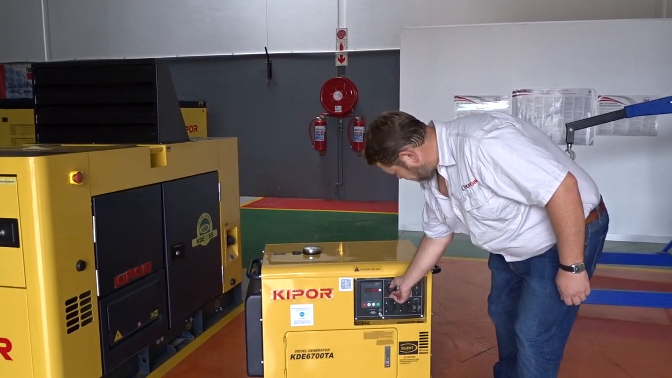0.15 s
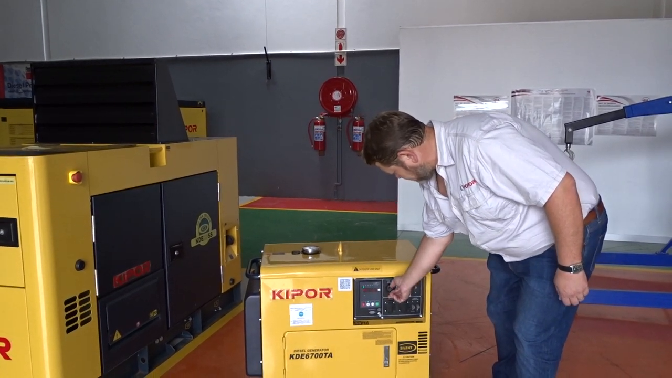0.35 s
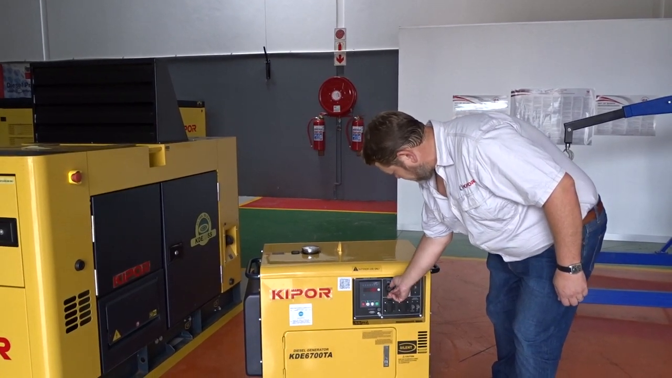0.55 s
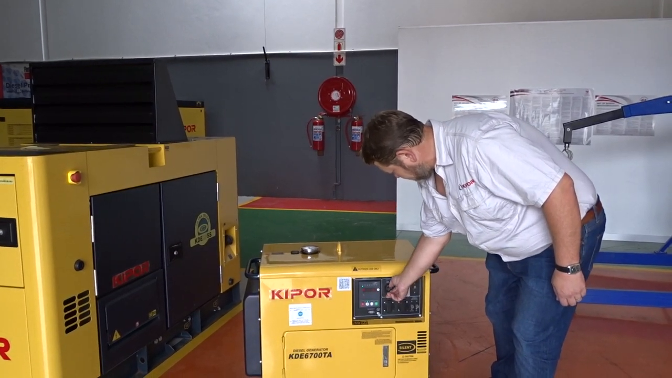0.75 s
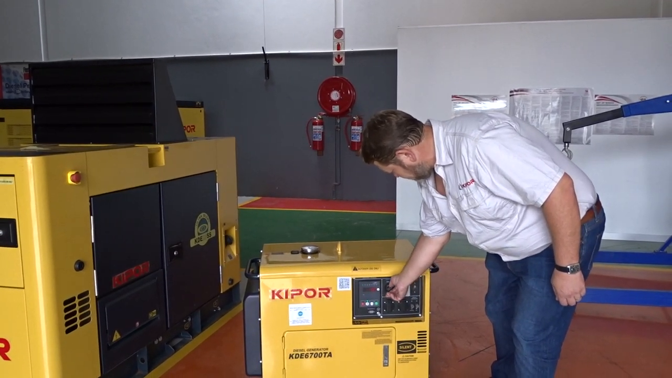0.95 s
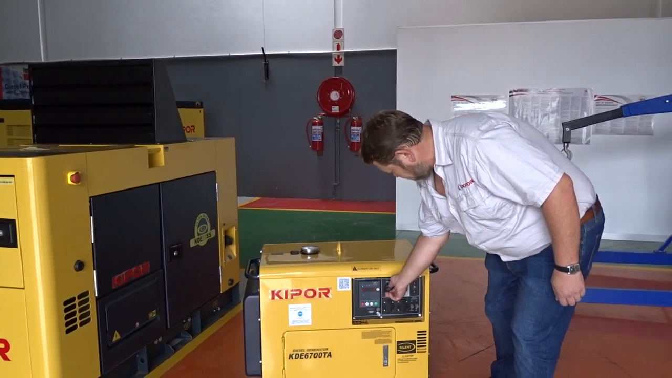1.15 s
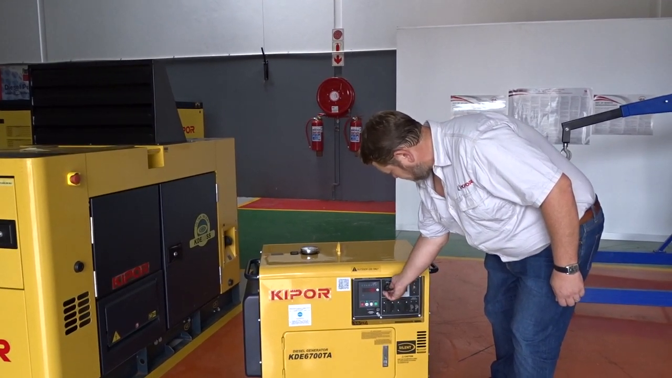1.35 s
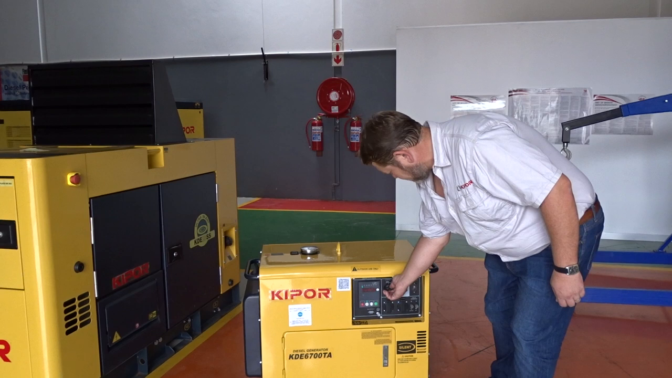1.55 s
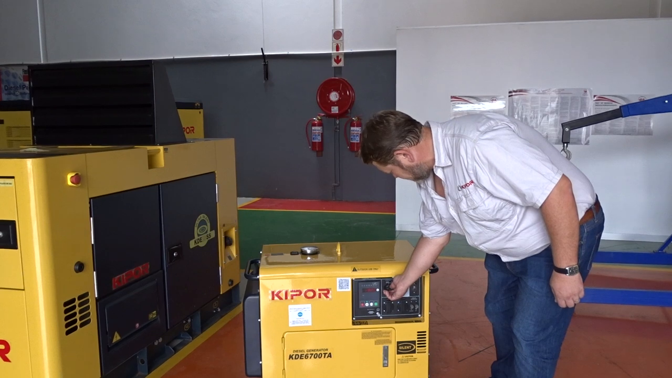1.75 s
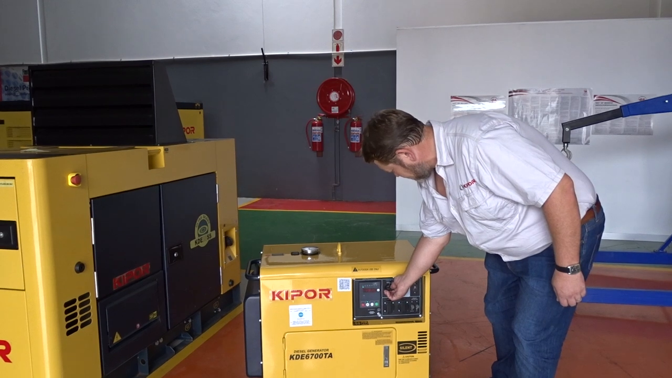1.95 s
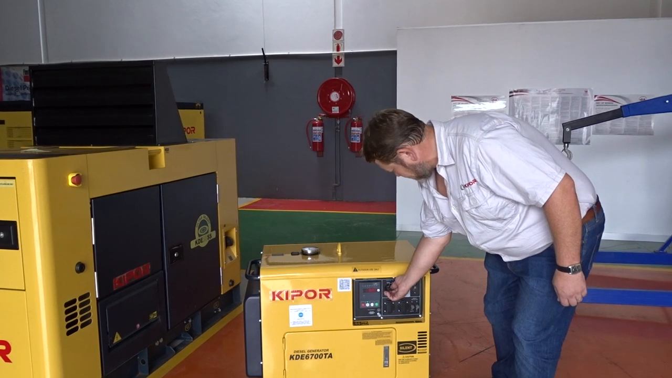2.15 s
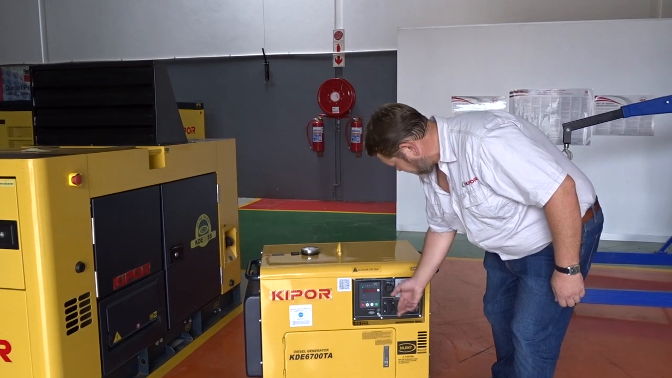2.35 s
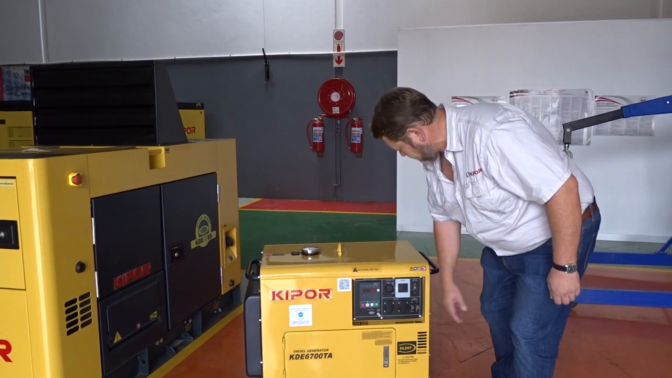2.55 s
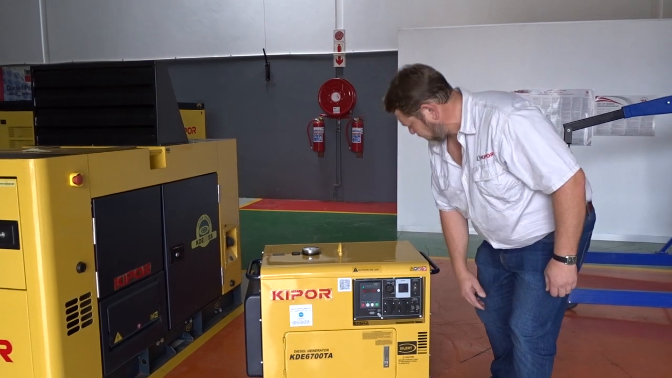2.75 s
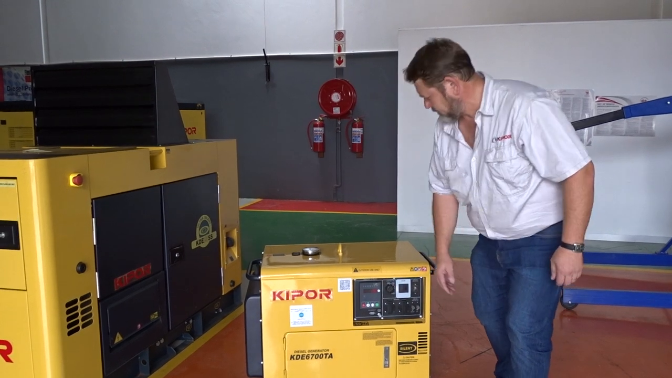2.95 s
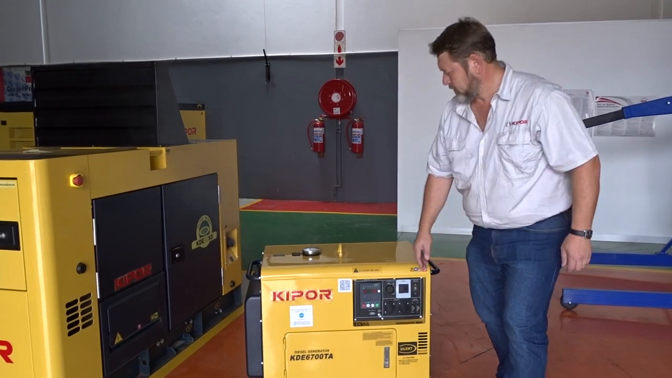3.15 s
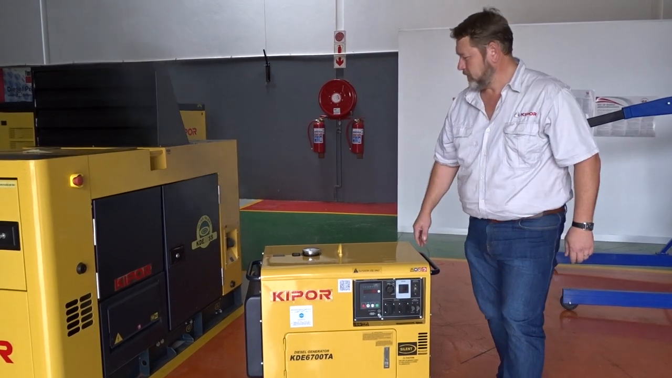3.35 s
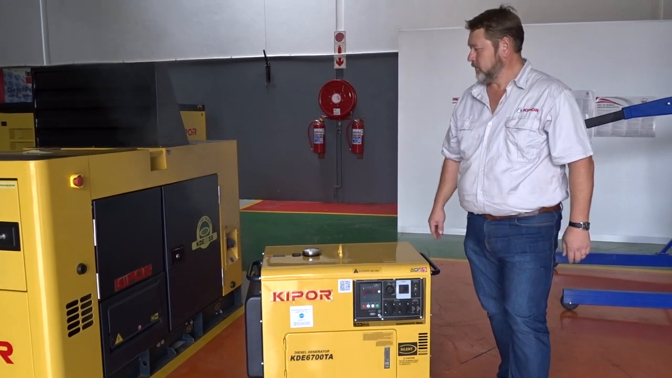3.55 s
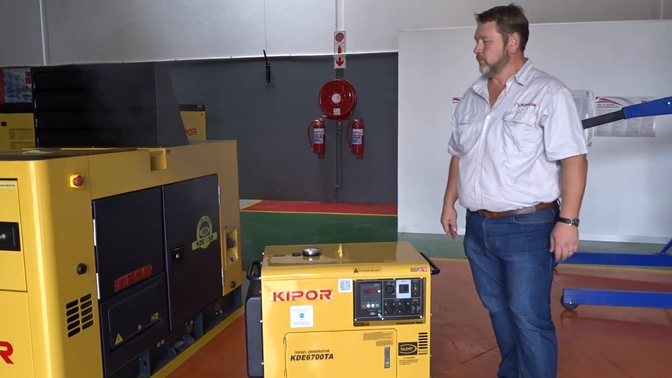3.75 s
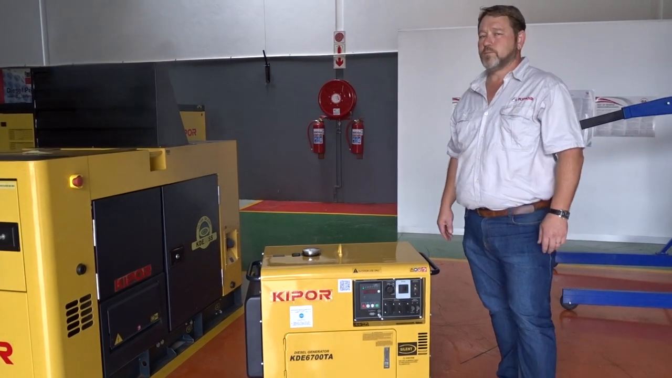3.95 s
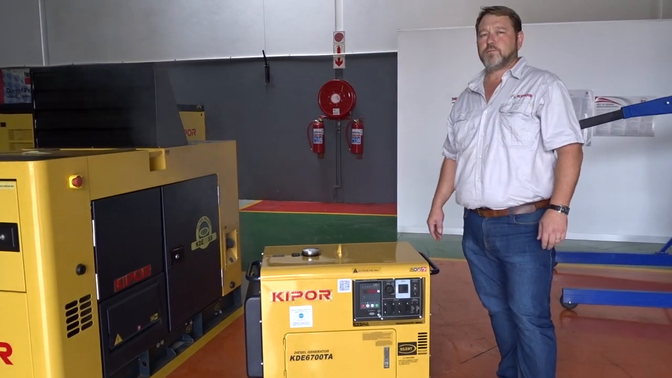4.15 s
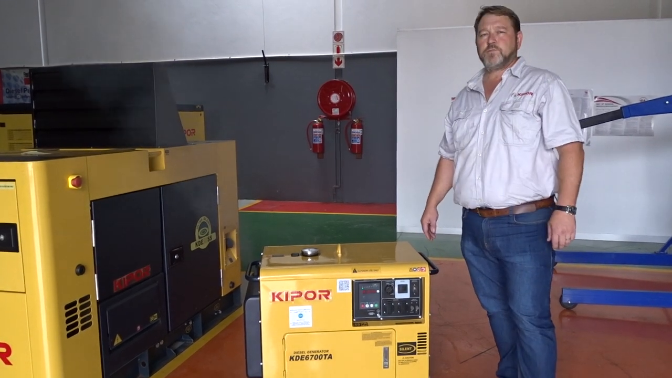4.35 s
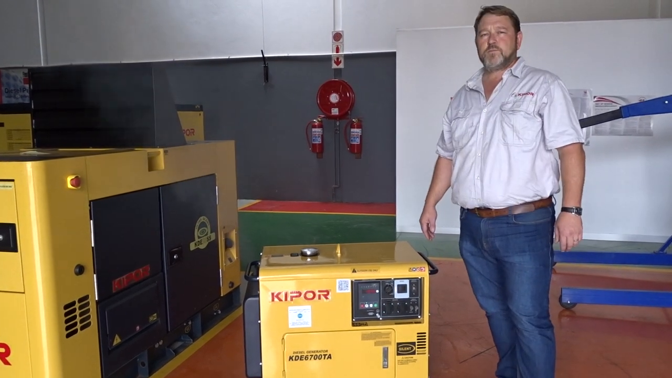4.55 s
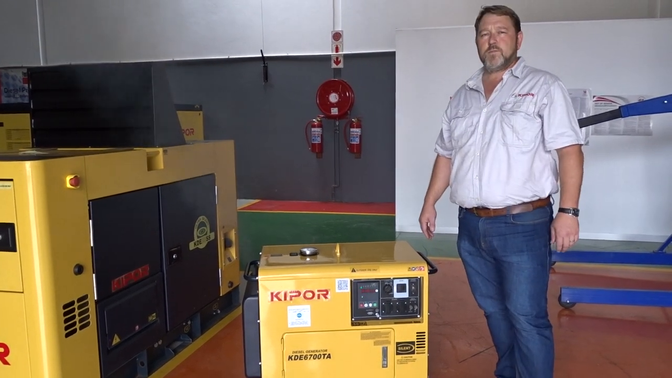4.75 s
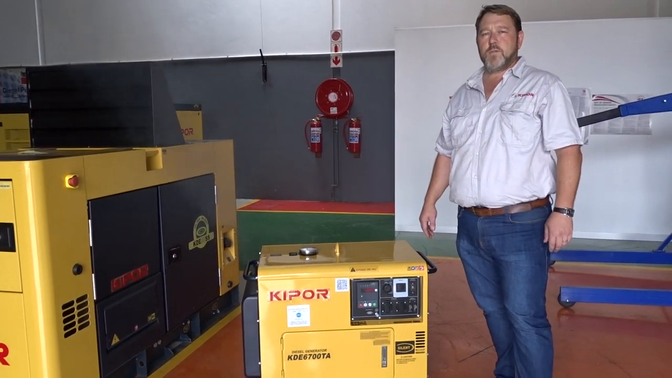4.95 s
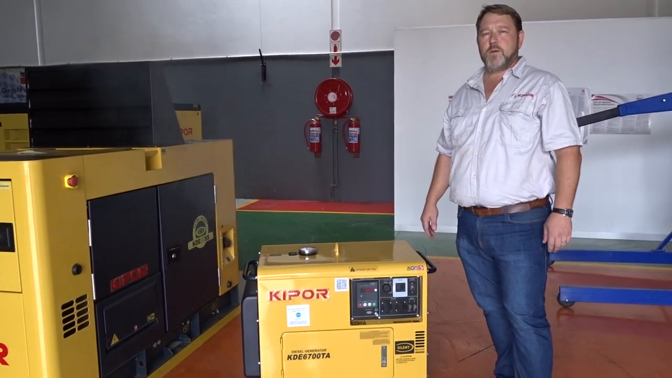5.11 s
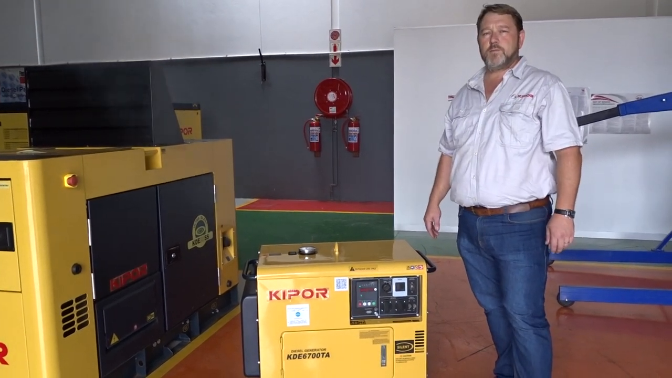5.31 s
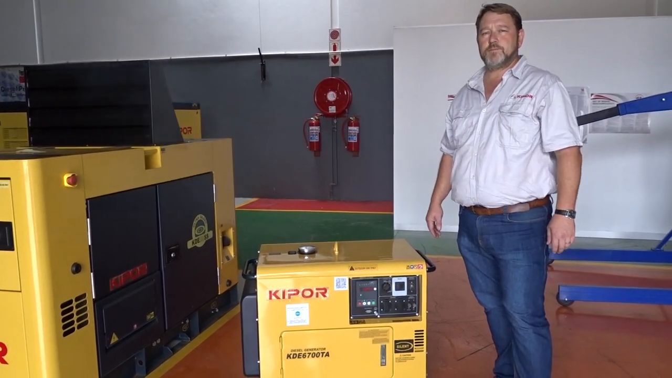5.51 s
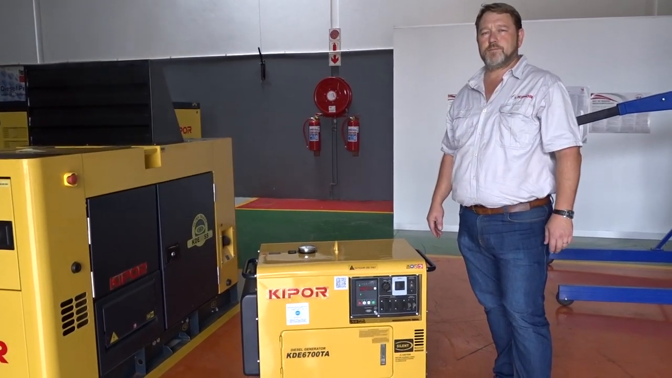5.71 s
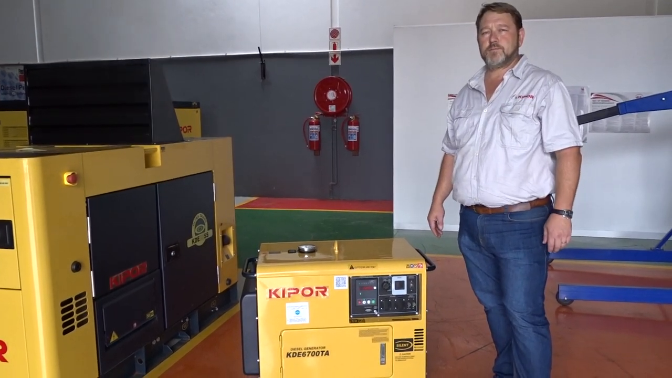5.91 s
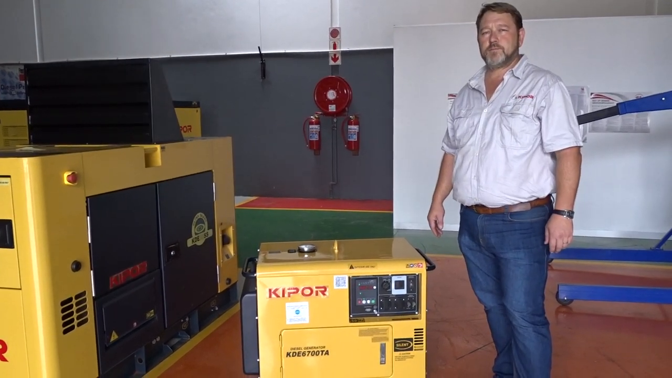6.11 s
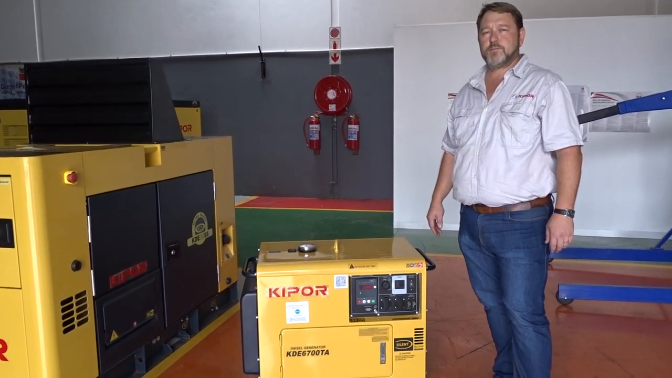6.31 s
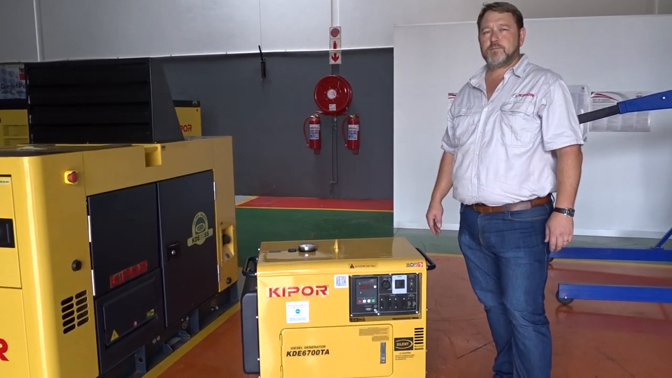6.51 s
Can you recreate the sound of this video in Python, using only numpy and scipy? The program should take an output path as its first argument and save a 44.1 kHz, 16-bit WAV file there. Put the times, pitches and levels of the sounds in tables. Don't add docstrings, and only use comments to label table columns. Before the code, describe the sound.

A boxed diesel generator starts indoors, heard in stereo from a few metres. Quiet room noise, a dry key click and relay snap, then a harsh metallic starter grind climbing in pitch. The first firing thumps the box; separate knocks quicken over rattling panels and blend into a low buzzing exhaust note with bright valve clatter, holding constant speed to the end.

```python
import sys
import numpy as np
from scipy import signal
from scipy.io import wavfile
from scipy.ndimage import uniform_filter1d

SR = 44100
rng = np.random.default_rng(int(sys.argv[2]) if len(sys.argv) > 2 else 0)


def dump(signal):
    limited = np.clip(np.atleast_2d(signal).T, -1, 1)
    pcm = np.round(limited * 32767).astype(np.int16)
    wavfile.write(sys.argv[1], SR, pcm)


def rack_gain(trim_db):
    fader = np.asarray(trim_db, float)
    return 10 ** (fader / 20)


N = 294147
T = np.arange(N) / SR

FIRST_FIRING_S = 2.055
GOVERNED_PER_S = 26.2

# (time [s], mesh frequency [Hz])
SPIN = [(1.36, 1350), (1.44, 1450), (1.55, 1680), (1.66, 2000), (1.78, 2330), (1.9, 2440), (2.03, 2630),
        (2.12, 2700), (2.3, 2750)]
# (frequency [Hz], likeness [0-1])
NEAR_LIKENESS = [(25, 0.97), (60, 1), (140, 1), (340, 0.93), (600, 0.94), (900, 0.82), (1920, 0.74),
                 (4570, 0.92), (10900, 0.63)]


def evened(x):
    return x / np.sqrt(np.mean(x ** 2) + 1e-20)


def steadied(x, span_s):
    power = uniform_filter1d((x ** 2).mean(0), round(span_s * SR))
    return x / np.sqrt(abs(power) + 1e-12)


def read(points, hz):
    f, value = np.transpose(points)
    return np.interp(np.log(hz + 1), np.log(f + 1), value)


def columns(rows):
    s, *values = np.transpose(rows)
    return [np.interp(T, s, v) for v in values]


def swells(rows, width_s):
    return sum(db * np.exp(-((T - s) / width_s) ** 2) for s, db in rows)


def wander(per_s):
    return evened(sum(np.sin(2 * np.pi * (f * T + rng.random())) / np.sqrt(f)
                      for f in np.geomspace(per_s / 10, per_s, num=16)))


def rings(modes):
    return lambda hz: np.sqrt(sum(rack_gain(2 * db) / (1 + (2 * (hz - f) / w) ** 2) ** 2 for f, w, db in modes))


def noise(colour, likeness=NEAR_LIKENESS, patchy_db=1.0, size=2048):
    # (frequency [Hz], left minus right [dB])
    left_lead = [(60, 0.0), (170, -0.5), (480, 1), (1360, -1.0), (3840, -1.0), (10900, -1.5)]
    frames, hz = 4 * N // size + 5, np.fft.rfftfreq(size, 1 / SR)
    a, b, c, d, patches = rng.standard_normal((frames, len(hz), 5)).T
    patches = uniform_filter1d(patches, size=12, axis=0)
    patches = evened(uniform_filter1d(patches, size=6, axis=1))
    if callable(colour):
        gain = colour(hz)
    else:
        gain = rack_gain(read(colour, hz)) * (hz < colour[-1][0] * 1.5)
    like = np.clip(read(likeness, hz), -1, 1)[:, None]
    tilt = rack_gain(read(left_lead, hz) / 2)[:, None]
    left = a + 1j * b
    right = like * left + np.sqrt(1 - like ** 2) * (c + 1j * d)
    z = np.array([left * tilt, right / tilt])
    z *= gain[:, None] * rack_gain(patchy_db * patches)
    return evened(signal.istft(z, nperseg=size, noverlap=3 * size // 4)[1][:, :N])


def ringing(modes, span_s, sway_db, per_s):
    return evened(sum(rack_gain(db + sway_db * wander(per_s)) * steadied(noise(rings([(f, w, 0)])), span_s)
                      for f, w, db in modes))


def background():
    # (frequency [Hz], density [dB per Hz])
    hall_colour = [(12, -52), (20, -12), (43, -7.5), (96, -4.5), (125, -9.5), (236, -0.5), (269, -11),
                   (299, -3.5), (351, -9.5), (536, -4.5), (1360, -11.5), (1630, -20), (3520, -30),
                   (4350, -35.5), (11300, -43.5), (14700, -80), (22000, -120)]
    # (frequency [Hz], likeness [0-1])
    far_likeness = [(60, 0.96), (170, 1), (480, 0.76), (1360, 0.62), (3840, 0.36), (10900, 0.62)]
    air = noise(hall_colour, far_likeness, 1) * rack_gain(-51 + .5 * wander(8))
    rise_db = 100 * (.72 - T)
    fall_db = 31 * (T - .98)
    whistle_db = -78 - np.maximum(rise_db, fall_db).clip(0)
    whistle = noise(rings([(4280, 330, 0), (5300, 120, -5)]), far_likeness, 1.5)
    return air + whistle * rack_gain(whistle_db) * (T < 1.4)


def ticks():
    # (time [s], peak [dB], frequency [Hz], width [Hz], t60 [s])
    clicks = [
        (.505, -71, 6000, 1200, .08),
        (1.251, -54, 8600, 2520, .05),
        (1.278, -65, 8500, 2500, .12),
        (1.337, -56, 4800, 1500, .08),
        (1.351, -44, 750, 200, .1),
        (1.338, -50, 9000, 3000, 0.27),
    ]
    # (time [s], peak [dB], frequency [Hz], width [Hz], t60 [s])
    jolts = [
        (2.058, -20, 750, 350, 0.65),
        (2.075, -21.5, 260, 270, 0.63),
        (2.236, -18, 610, 230, 0.41),
        (1.368, -26.5, 390, 400, 0.76),
        (2.648, -27.5, 8100, 5400, 0.33),
    ]
    out = np.zeros((2, N))
    for s, db, hz, width_hz, t60 in [*clicks, *jolts]:
        after = np.maximum(T - s, 0)
        onset = np.minimum(after * hz / 6, 1)
        out += noise(rings([(hz, width_hz, 0)]), size=512) * rack_gain(db - 60 * after / t60) * onset
    return out


def starter_levels():
    # (time [s], level [dB])
    gear_strain = [(1.5, 3), (1.85, 3.5), (2.09, 5), (2.42, 1), (2.54, -6)]
    # (time [s], level [dB])
    hum_strain = [(1.385, 8), (1.575, 6.5), (1.75, -5), (1.86, -5), (2.05, 6.5), (2.17, -8), (2.37, 7),
                  (2.56, 5.5)]
    # (time [s], level [dB])
    grind_strain = [(1.49, 1.8), (1.57, 2.2), (1.795, 3.8), (2.04, 2.7)]
    engage_s, strain_s = 1.385, 0.038
    laws = (-24.5, -9.5), (-35.5, 8.5), (-40, 5.5), (-37, -4.5)
    hz, = columns(SPIN)
    spin = (hz - hz[0]) / (hz[-1] - hz[0])
    grind, rasp, gear, hum = (a + b * np.sin(np.pi / 2 * spin) for a, b in laws)
    slam = np.exp(-np.maximum(T - engage_s, 0) / 0.034)
    closing = -1700 * np.maximum(engage_s - .012 - T, 0)
    grind = grind + 1.5 * slam + closing + swells(grind_strain, strain_s)
    rasp = rasp + 7 * slam + closing
    return grind, rasp, gear + swells(gear_strain, strain_s), hum + swells(hum_strain, strain_s)


def starter():
    # (frequency [Hz], density [dB per Hz])
    grind_colour = [(18, -42), (30, -23), (151, -7), (335, 3.5), (389, -3.5), (570, 0), (620, -2),
                    (939, -3), (1110, -13), (1210, -13), (1600, -7.5), (2080, -49), (3520, -120)]
    # (frequency [Hz], density [dB per Hz])
    rasp_colour = [(820, -22), (1400, -2), (1870, -6.5), (3570, -9), (3930, -10), (4440, -11.5),
                   (5620, -9.5), (6350, -14.5), (7430, -9), (9920, -15), (11300, -29.5), (14700, -61),
                   (22000, -120)]
    # (frequency [Hz], width [Hz], level [dB])
    gear_modes = [(2006, 33, -8), (2370, 150, -11), (2900, 37, -7.5), (3920, 155, 4.5), (5060, 40, -6),
                  (5710, 60, -5.5), (7200, 160, -10), (7750, 110, -11), (8600, 260, -15), (10070, 130, -13)]
    # (frequency [Hz], width [Hz], level [dB])
    housing_modes = [(345, 74, 7.5), (577, 20, 8), (1094, 31, 8.5)]
    contact_s, let_go_s = 1.336, 2.5
    grind_db, rasp_db, gear_db, hum_db = starter_levels()
    gear_db = gear_db - np.interp(T, [2.12, 2.3], [0, 4])
    eased_db = -3 * np.clip((T - FIRST_FIRING_S) / .15, 0, 1) - 450 * np.maximum(T - let_go_s, 0)
    on = rack_gain(eased_db) * np.clip((T - contact_s) / .004, 0, 1)
    grind = evened(noise(grind_colour) + 0.65 * ringing(housing_modes[:2], 0.15, 1.3, 7))
    hum = rack_gain(hum_db + 3) * ringing(housing_modes[2:], 0.043, 1, 10)
    hum = hum * np.clip((T - 1.36) / 0.022, 0, 1)
    teeth = rack_gain(gear_db + 3) * ringing(gear_modes, 0.081, 1.8, 12)
    teeth = teeth * np.clip((T - 1.42) / 0.05, 0, 1)
    rasp = rack_gain(rasp_db - 1.5) * steadied(noise(rasp_colour, patchy_db=3.0), .08)
    return on * (rack_gain(grind_db) * grind + hum + teeth + rasp)


def mesh():
    hz, = columns(SPIN)
    db = -38 - ((hz - 2150) / 300) ** 2 - 130 * np.maximum(T - 2.04, 0)
    shake = uniform_filter1d(rng.standard_normal((2, 2, N)), size=350)
    shake = evened(shake[0]) + 1j * evened(shake[1])
    shared_and_own = 0.55 * shake[0] + 0.29 * shake
    tone = (shared_and_own * np.exp(2j * np.pi * np.cumsum(hz) / SR)).real
    return rack_gain(db) * tone * np.clip((T - 1.36) / .08, 0, 1)


def exhaust(cycles, rate):
    # (multiple of the firing rate, level [dB])
    orders = [(1, -24), (2, -18), (3, -2), (4, 0), (5, -8), (6, -2), (7, -4), (8, -1), (9, -7), (10, -10),
              (11, -5), (12, -14), (13, -10), (14, -6), (15, -16), (16, -7), (17, -15), (18, -11),
              (19, -12)]
    puffs = [(.07, .97), (.34, 1.), (.58, .5), (.72, .35), (.91, .6)]
    # (frequency [Hz], width [Hz], level [dB])
    air_modes = [(89.4, 28, 16), (136, 60, 1), (172, 43, 0.5), (250, 16, -6), (356, 34, -2)]
    share, strength = np.transpose(puffs)
    note = np.zeros((2, N))
    for k, db in orders:
        lag = np.angle(np.sum(strength * np.exp(-2j * np.pi * k * share)))
        bass = 1 / (1 + (66 / (k * rate)) ** 4)
        boom = 1 + rings(air_modes)(k * rate)
        sway = rack_gain(db + 1.1 * wander(6)) * bass / bass[-1] * boom / boom[-1]
        skew = (.1 + .002 * k) * wander(2) * np.array([[1], [-1]])
        note += sway * np.cos(2 * np.pi * k * cycles + lag + .008 * k * wander(8) + skew)
    return steadied(note, .4)


def bursts(cycles, at, decay_s, spread_db):
    count = np.floor(cycles - at).astype(int)
    sizes = rack_gain(spread_db * rng.standard_normal(200))
    starts = np.diff(count, prepend=count[0]) * sizes[count % 200]
    fall = np.exp(-1 / (decay_s * SR))
    return uniform_filter1d(signal.lfilter([1], [1, -fall], starts), size=300)


def panel(cycles, locked):
    # (frequency [Hz], width [Hz], level [dB])
    panel_modes = [(560, 13, 0), (615, 24, -10)]
    strikes = np.diff(np.floor(cycles - .8), prepend=-1) * rack_gain(0.58 * wander(28))
    t = np.arange(SR // 4) / SR
    ring = sum(rack_gain(db) * t * np.exp(-2 * np.pi * w * t) * np.sin(2 * np.pi * f * t)
               for f, w, db in panel_modes)
    struck = signal.oaconvolve(strikes, ring)[:N] * np.ones((2, 1))
    rattled = steadied(noise(rings(panel_modes), size=4096), .04)
    return np.sqrt(locked) * steadied(struck, 0.17) + np.sqrt(1 - locked) * rattled


def covers(rate):
    # (frequency [Hz], width [Hz], level [dB], best speed [firings per s], reach [firings per s])
    loose_covers = [(727, 33, -4, 24.2, 8), (1310, 87, 0, 17.2, 4.8), (1562, 81, -0.5, 12, 3.2),
                    (1120, 230, 4, 21, 2.3), (1076, 44, -2.5, 27.4, 2.7), (2062, 190, -4, 29, 5.9),
                    (2480, 72, -8.5, 26.6, 3)]
    return sum(rack_gain(db + 2.8 * wander(5)) * np.exp(-((rate - best) / reach) ** 2) * noise(rings([(f, w, 0)]))
               for f, w, db, best, reach in loose_covers)


def hall(x):
    # (frequency [Hz], t60 [s])
    hall_decay = [(200, 1.3), (1000, 0.33), (4000, 1.1), (10000, 0.33)]
    taps = np.zeros((2, SR // 2))
    at = np.arange(400, SR // 2 - 20, 20) + rng.integers(0, 20, (2, (SR // 2 - 401) // 20))
    np.put_along_axis(taps, at, rng.choice([-1., 1.], at.shape), 1)
    hz, t, z = signal.stft(taps, SR, nperseg=256)
    tail = signal.istft(z * rack_gain(-60 * t / read(hall_decay, hz)[:, None]), SR, nperseg=256)[1]
    return signal.fftconvolve(x, tail / np.linalg.norm(tail[0]), axes=1)[:, :N]


def engine_levels(rate):
    # (time [s], opening [0-1])
    fuel_rack = [(2.05, 0.44), (2.6, 0.36), (3.1, 0.58), (3.45, 0.99), (3.8, 0.91), (4.3, 1.05), (4.55, .9),
                 (4.72, 0.5), (4.9, 0.2), (5.2, 0.04), (5.4, 0.33), (5.95, .2), (6.1, 0.37), (6.3, 0.31),
                 (6.5, 0.46), (6.67, .2)]
    # (time [s], level [dB])
    lurches = [(2.35, 6), (2.62, 2.5), (2.77, -1), (4.72, 1.5), (6.2, 1.8), (6.38, 2)]
    # (time [s], level [dB])
    panel_swings = [(2.63, 3.5), (2.69, -6), (2.77, 4), (2.86, -4.5), (2.93, 2.5), (3.0, 2), (3.12, 3.5),
                    (3.28, 1.5), (3.45, -2), (3.63, 3), (3.75, -2), (3.95, 1.5), (4.24, -2), (4.4, -2),
                    (4.6, 3), (4.78, 3), (4.92, 3.5), (5.18, -1), (5.9, 2.5), (6.35, 1)]
    # (time [s], level [dB])
    casing_swings = [(2.08, 6), (2.25, 1), (2.38, -1), (2.78, -2.5), (2.84, 4), (3.0, 1.7), (3.7, -2.5),
                     (4.15, -4), (4.4, 1.2)]
    # (speed [firings per s], level [dB])
    knock_by_speed = [(7.5, 0), (11.5, 6.5), (16, 6.5), (23.5, -4.5)]
    speed, fuel = rate / GOVERNED_PER_S, columns(fuel_rack)[0]
    weak = np.clip((2.236 - T) / 0.027 + .5, 0, 1)

    def law(rest_db, speed_db, fuel_db, weak_db, drive=speed):
        return rest_db + speed_db * drive + fuel_db * fuel + weak_db * weak

    thump = law(-23, 5.5, -2, -1.5, speed ** 1.3)
    ring = law(-22.5, -3.5, 4.5, -7.5)
    casing = law(-23.5, -3.5, 4, -6)
    clatter = law(-31, 1.28, 7, -0.5)
    ring = ring + 2 * np.exp(-((rate - 15.4) / 4.9) ** 2)
    swing_s = 0.044 * np.clip(T - 2, .4, 2.5)
    thump = thump + swells(lurches, 0.075)
    ring = ring + swells(panel_swings, swing_s)
    casing = casing + swells(casing_swings, 0.048)
    return thump, ring, casing, clatter, np.interp(rate, *np.transpose(knock_by_speed))


def engine():
    # (time [s], speed [firings per s])
    run_up = [(2.0, 5.25), (2.3, 5.96), (2.55, 7.87), (2.8, 11.02), (3.1, 13.91), (3.5, 17.23),
              (3.9, 20.17), (4.3, 23.54), (4.6, 25.42), (4.85, 26.37), (5.3, 26.13), (5.8, 26.17),
              (6.2, 25.98), (6.67, 26.13)]
    # (frequency [Hz], density [dB per Hz])
    thump_colour = [(15, -46), (25, -20), (87, -4.5), (214, 1), (269, 0), (329, 3), (403, -4.5), (501, 0.5),
                    (520, -18), (680, -27), (1140, -120)]
    casing_colour = [(350, -42), (600, -1), (651, -8), (728, -2), (790, -9), (1310, -9), (1420, -11),
                     (1900, -18.5), (2470, -19), (4180, -120)]
    clatter_colour = [(1000, -1), (1700, -6.5), (1840, -6.5), (2010, 0.5), (2230, -9.5), (2530, -3.5),
                      (5160, -11), (8640, -10), (10600, -16), (11300, -23), (14700, -82), (22000, -120)]
    knock_colour = [(710, -17), (1200, -4.5), (1310, -17), (1450, -12.5), (1580, 1.5), (1830, -3.5),
                    (2520, -2), (5140, -15.5), (8530, -11.5), (10600, -16.5), (11300, -54), (14700, -59),
                    (22000, -120)]
    rate, = columns(run_up)
    fired = T >= FIRST_FIRING_S
    cycles = np.cumsum(rate * fired) / SR - (T < FIRST_FIRING_S) / 2
    thump_db, panel_db, casing_db, clatter_db, knock_db = engine_levels(rate)
    speed = np.minimum(rate / GOVERNED_PER_S, 1)
    locked, struck = .93 * speed ** 2.5, .2 + .66 * speed ** 10

    loose = noise(thump_colour, size=4096) * (1 + .5 * bursts(cycles, 0.39, 0.0057, 1.7))
    deep = signal.sosfiltfilt(signal.butter(2, 140, fs=SR, output="sos"), loose)
    loose = loose - deep * np.clip(1 - rate / 14, 0, 1)
    thump = np.sqrt(locked) * exhaust(cycles, rate) + np.sqrt(1 - locked) * steadied(loose, 0.41)

    slap = 1 + 0.78 * bursts(cycles, 0.68, 0.013, 3) + 0.24 * bursts(cycles, 0, 0.0019, 2)
    casing = (noise(casing_colour) + 0.34 * covers(rate)) * slap

    blows = bursts(cycles, 0.936, 0.021, 0.7) + .5 * bursts(cycles, 0.22, 0.018, 0.95)
    knock = noise(knock_colour, patchy_db=1.2, size=512) * blows * rack_gain(knock_db)
    clatter = noise(clatter_colour, patchy_db=2, size=1024) * 0.69
    clatter = clatter + knock + rack_gain(-9.5) * hall(knock)

    parts = rack_gain(thump_db) * thump
    parts += rack_gain(panel_db) * panel(cycles, struck)
    parts += rack_gain(casing_db) * steadied(casing, 0.37)
    parts += rack_gain(clatter_db) * steadied(clatter, 0.3)
    return parts * np.clip((T - 2.052) / 0.02, 0, 1)


def scene():
    return background() + ticks() + starter() + mesh() + engine()


def top_cut(x):
    return signal.sosfilt(signal.butter(12, 11460, fs=SR, output="sos"), x)


def record(dry):
    rounded = dry / (1 + (abs(dry) / .68) ** 4) ** .25
    low_pass = signal.firwin(801, 11290, window=("kaiser", 8), fs=SR)
    limited = signal.oaconvolve(rounded, low_pass[None], "same")
    return top_cut(limited)


dry = scene()
out = record(dry)
dump(out)
```